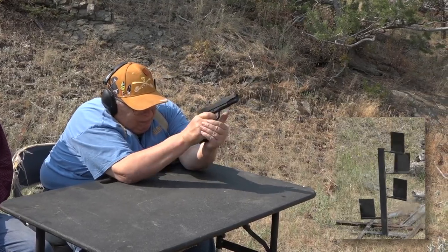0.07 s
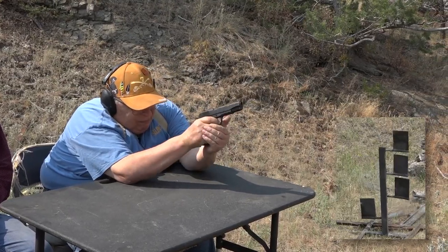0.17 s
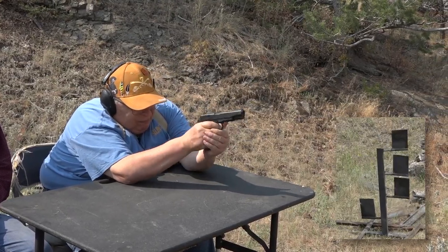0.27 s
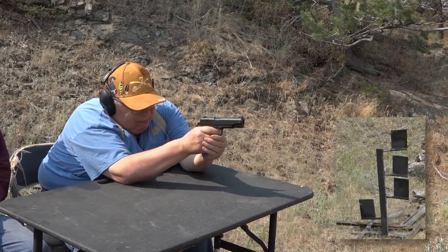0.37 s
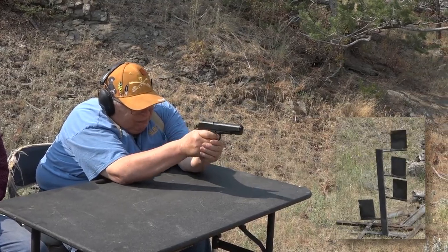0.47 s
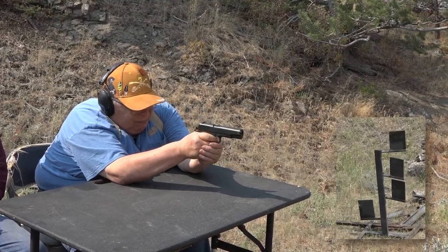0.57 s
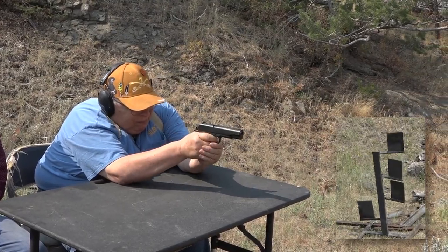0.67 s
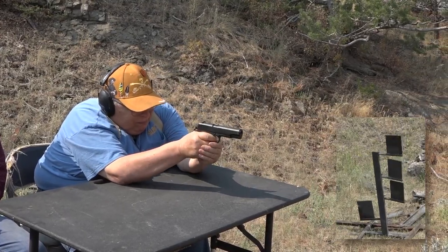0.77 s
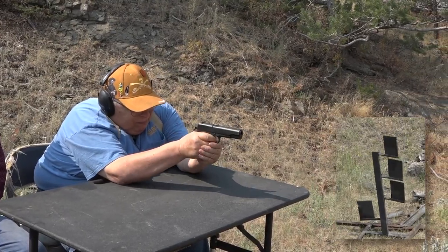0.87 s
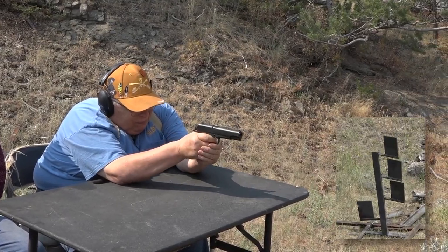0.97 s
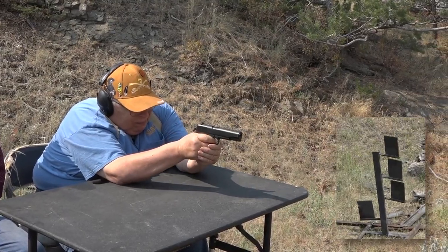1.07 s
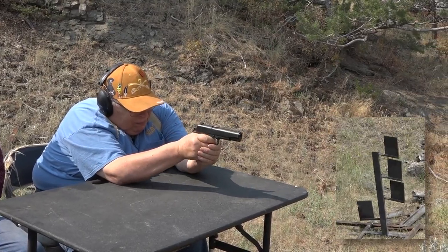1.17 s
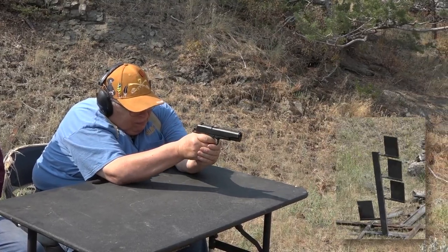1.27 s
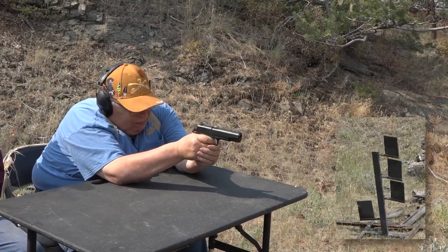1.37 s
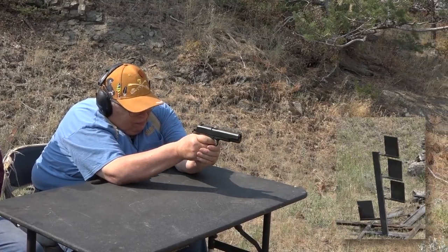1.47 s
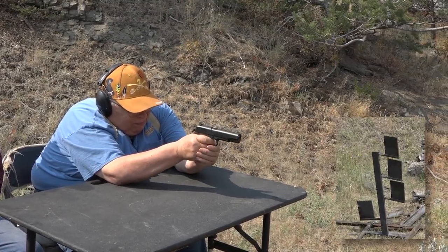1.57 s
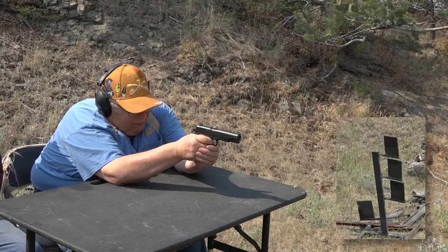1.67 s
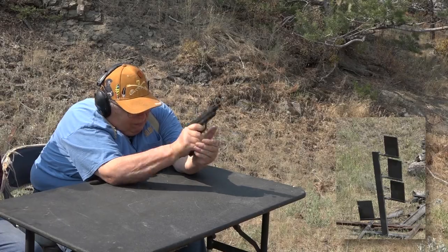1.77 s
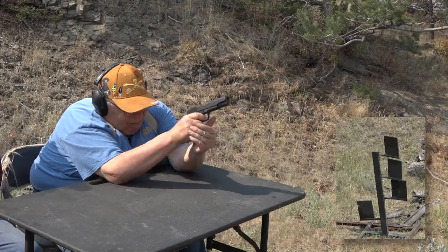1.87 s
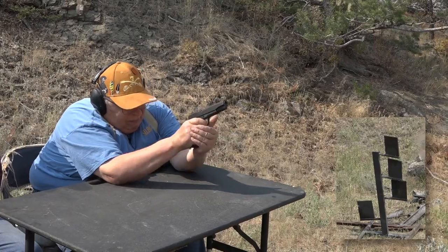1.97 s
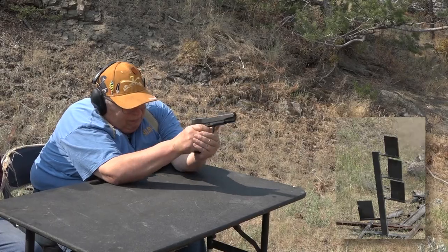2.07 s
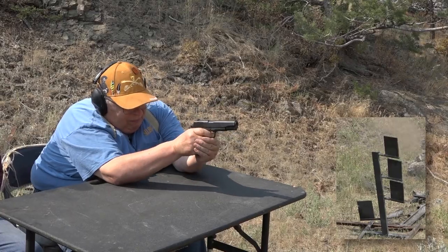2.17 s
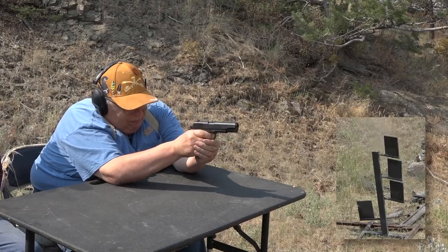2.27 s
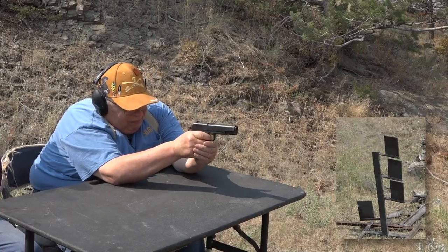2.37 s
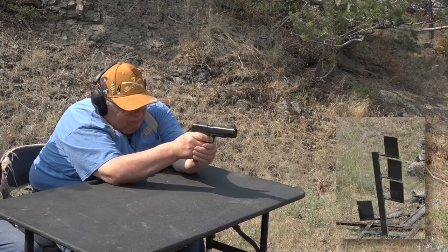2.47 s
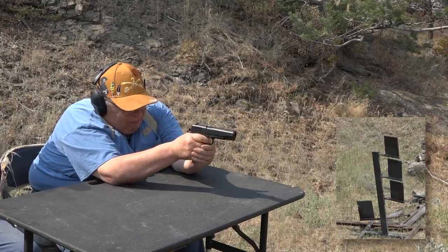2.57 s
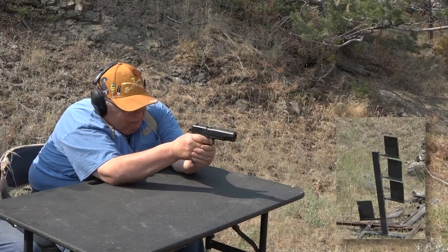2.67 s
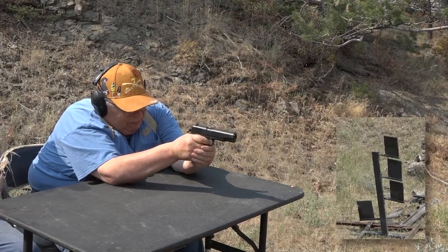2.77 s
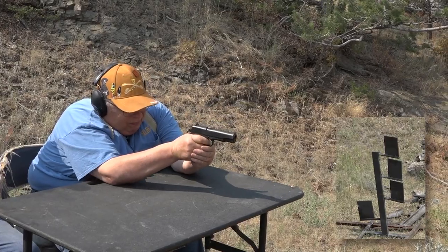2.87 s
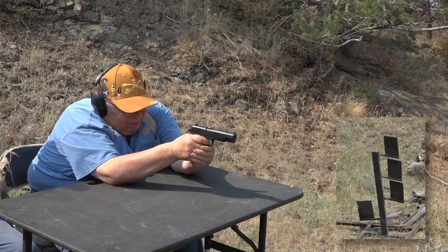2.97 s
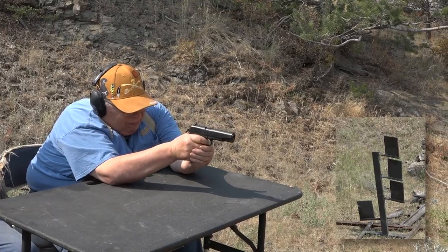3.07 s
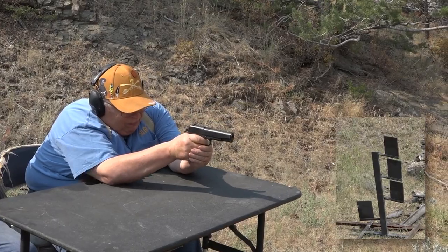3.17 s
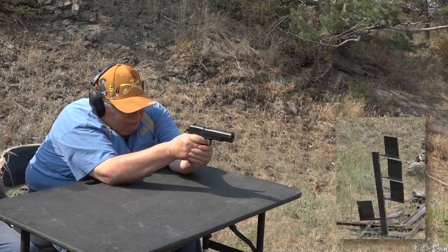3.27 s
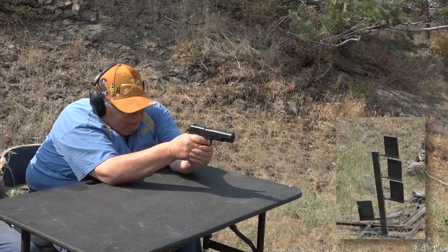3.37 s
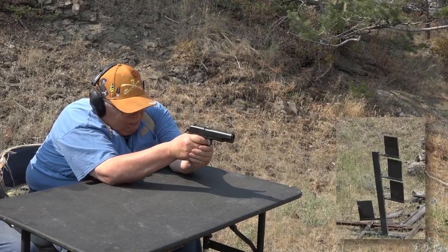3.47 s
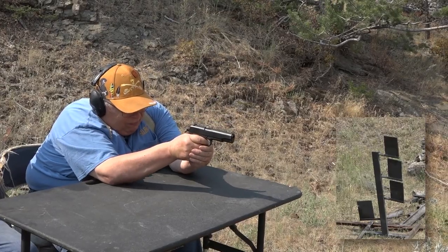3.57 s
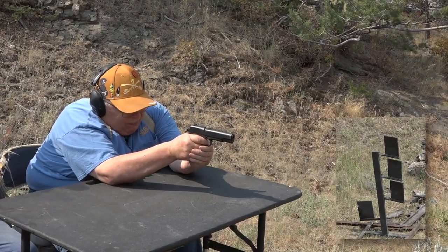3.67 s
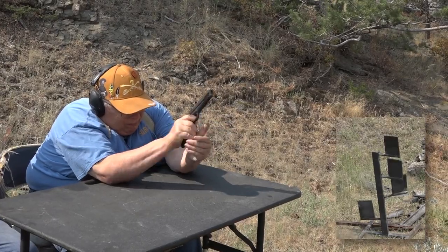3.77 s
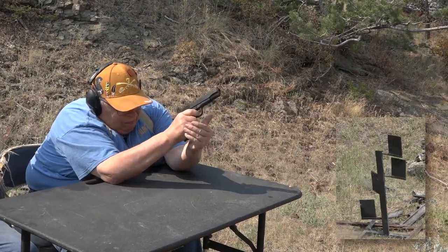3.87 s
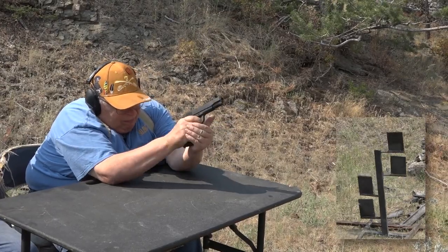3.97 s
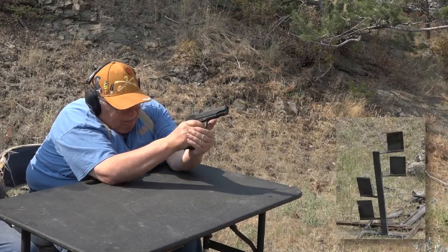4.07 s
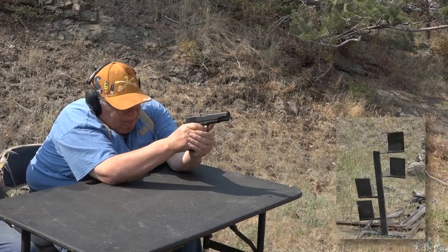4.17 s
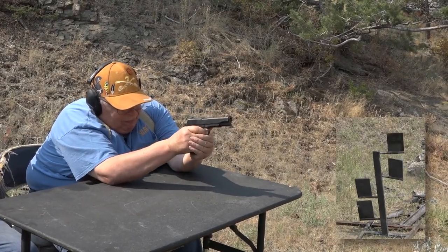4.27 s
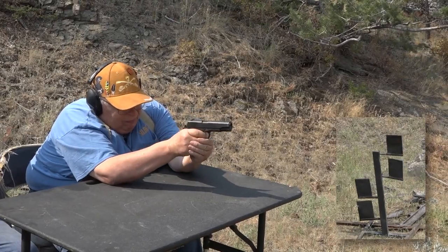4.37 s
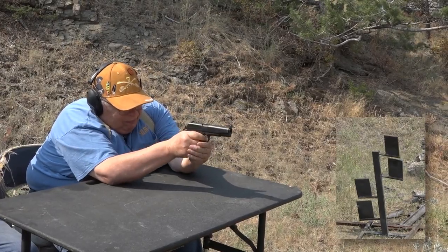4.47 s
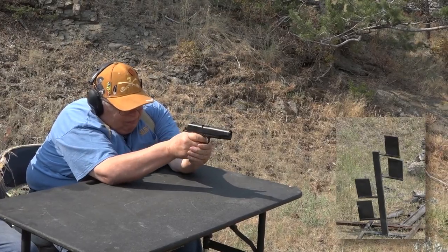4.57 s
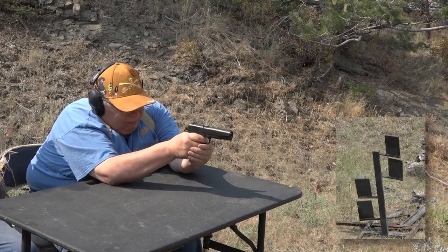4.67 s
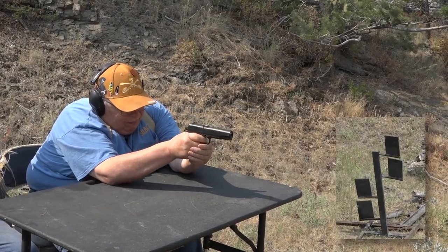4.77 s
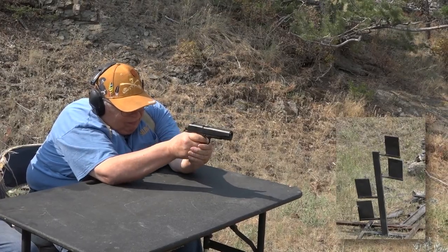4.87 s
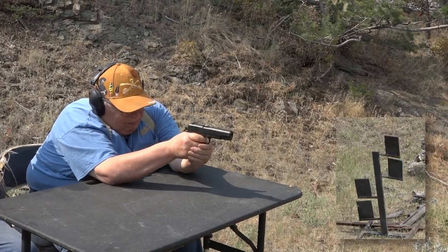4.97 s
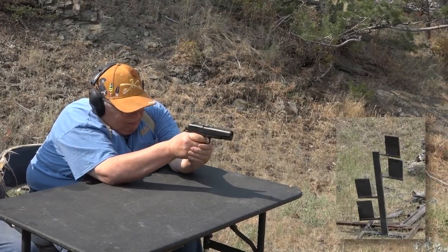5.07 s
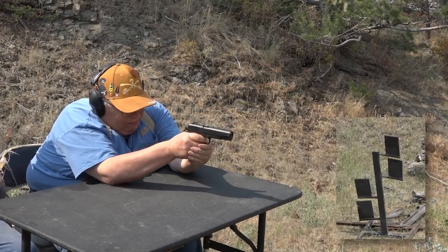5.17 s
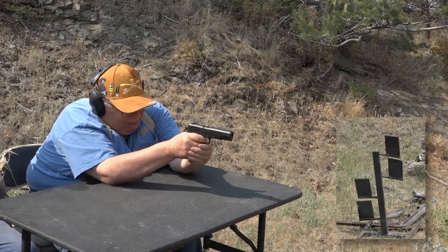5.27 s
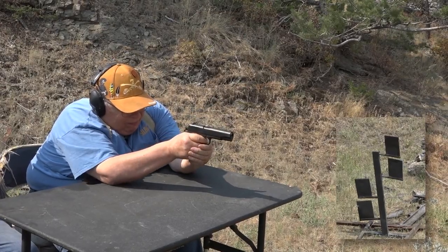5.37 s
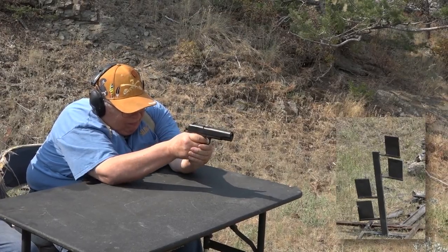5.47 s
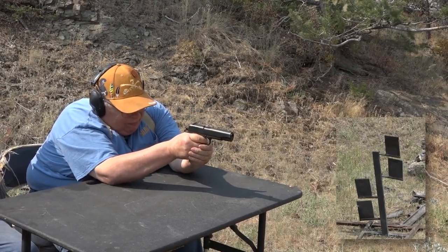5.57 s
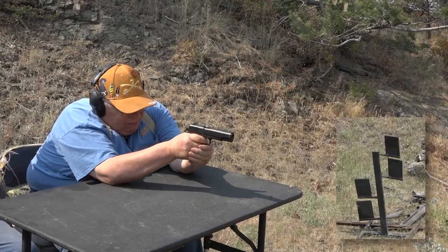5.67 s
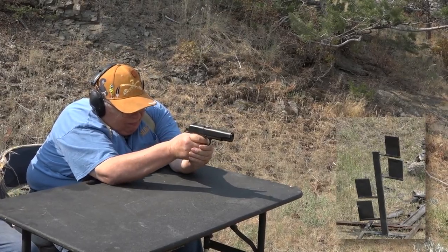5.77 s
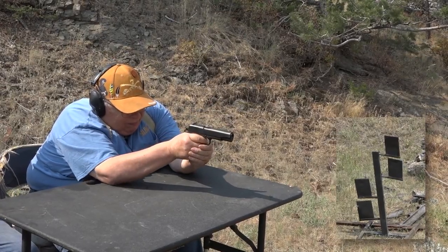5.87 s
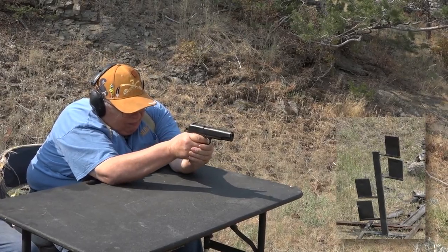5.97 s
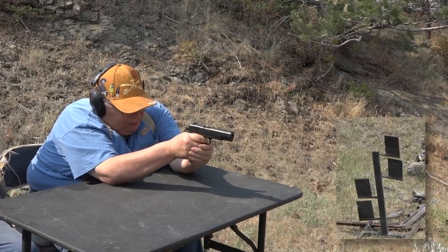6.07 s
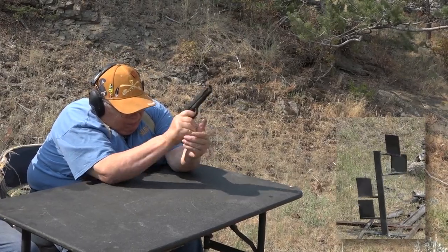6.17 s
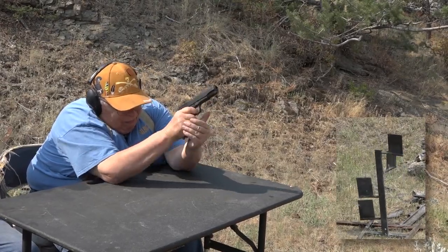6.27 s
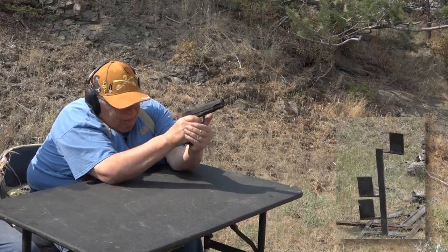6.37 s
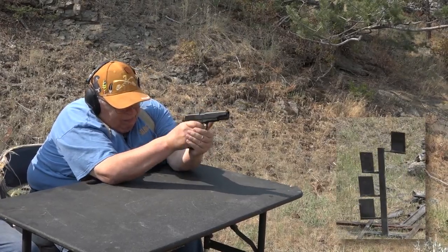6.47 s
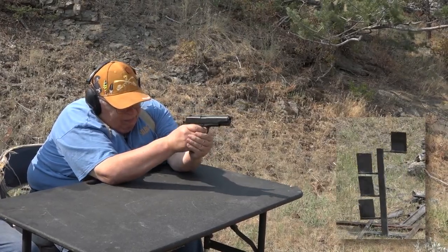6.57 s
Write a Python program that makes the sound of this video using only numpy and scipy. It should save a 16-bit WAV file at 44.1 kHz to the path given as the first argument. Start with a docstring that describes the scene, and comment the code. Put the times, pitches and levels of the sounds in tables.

```python
"""An outdoor range below a rocky slope: a pistol is fired slowly, the first shot just before the start.
Each blast overloads the microphones and scatters back from ground, slope and trees, with one late slap
from a far bank and soft puffs from distant ridges. A tenth of a second after each shot the bullet
strikes a steel paddle, which rings as it swings round. Spent brass sings as it tumbles.
Small metal ticks, pings and faint hoots sound over a light wind that buffets the microphones."""
import sys
import numpy as np
from scipy import signal
from scipy.fft import rfft, irfft, next_fast_len
from scipy.io import wavfile

SR = 44100
rng = np.random.default_rng(int(sys.argv[2]) if len(sys.argv) > 2 else 0)


def master(y):
    """Save y as 16-bit WAV."""
    cut = np.clip(np.atleast_2d(y).T, -1, 1)
    pcm = np.round(cut * 32767)  # scale
    wavfile.write(sys.argv[1], SR, pcm.astype(np.int16))


N = 292455
EVENT_SAMPLES = int(1.3 * SR)
AGE_S = np.arange(EVENT_SAMPLES) / SR
CUTOFF_HZ = 15900

# Pistol shots. Each row: start in seconds, then gains in dB of blast, far bank and ridges.
SHOTS = [(-0.1055, 1.5, -1.5, 7.5), (1.8119, 1, -1, -10), (3.7816, 1.5, 2.5, 6), (6.1667, 1.5, -4, 0)]
# Spectrum of far echoes. Each row: frequency in Hz, relative density in dB.
FAR_SPECTRUM = [(100, -20), (350, -2), (600, 9), (1500, 4.5), (2400, -8), (5000, -13), (9000, -29.5),
                (15000, -40)]
# Spectrum of metal ticks and bullet splash. Each row: frequency in Hz, relative density in dB.
METAL_SPECTRUM = [(1000, -25.5), (3000, -9), (7000, -7.5), (11000, 2), (15000, -5)]


def from_db(db):
    return 10 ** (np.asarray(db) / 20)


def unit_rms(x):
    return x / np.sqrt(np.mean(x ** 2) + 1e-20)


def pan(side_db):
    """Stereo gains; side is left minus right."""
    return from_db(np.array([[side_db], [-side_db]]) / 2)


def add(out, sound, start_s):
    """Mix a sound in; the start may be negative."""
    at = round(start_s * SR)
    first, last = max(at, 0), min(at + sound.shape[-1], out.shape[-1])
    if last > first:
        out[:, first:last] += sound[..., first - at:last - at]


def low_pass(x, hz):
    return signal.sosfilt(signal.butter(2, min(hz, .45 * SR), fs=SR, output="sos"), x)


def decay(t60_s):
    return np.exp(-np.minimum(np.log(1000) * AGE_S / t60_s, 40))


def swell(db, attack_s, rise_db, hold_s, sag_db, fall_db_per_s):
    """Gain that rises, sags while it holds, then falls."""
    rising_db = rise_db * np.maximum(1 - AGE_S / attack_s, 0)
    sagging_db = sag_db * np.clip((AGE_S - attack_s) / hold_s, 0, 1)
    falling_db = fall_db_per_s * np.maximum(AGE_S - attack_s - hold_s, 0)
    return from_db(db - rising_db - sagging_db - falling_db)


def wander(size, hz):
    """Slow random curve, rms 1."""
    return unit_rms(low_pass(rng.standard_normal(size + EVENT_SAMPLES), hz)[EVENT_SAMPLES:])


def noise(spectrum, size, coherence=0, peaks=()):
    """Stereo noise with a given spectrum, left-right coherence and resonances; rms 1."""
    padded = next_fast_len(size)
    hz = np.arange(padded // 2 + 1) * SR / padded + 1e-3
    knots_hz, knots_db = np.transpose(spectrum)
    db = np.interp(np.log(hz), np.log(knots_hz), knots_db)
    for centre_hz, width_hz, height_db in peaks:
        db += height_db / (1 + (2 * (hz - centre_hz) / width_hz) ** 2)
    white = rng.standard_normal((3, padded))
    stereo = np.sqrt(1 - coherence) * white[:2] + np.sqrt(coherence) * white[2]
    return unit_rms(irfft(rfft(stereo) * from_db(db), padded)[:, :size])


def bursts(rows, spectrum, size, rise_s):
    """Short, decaying, low-passed noise bursts."""
    out = np.zeros((2, size))
    length = EVENT_SAMPLES // 4
    for start_s, db, t60_s, top_hz, side_db in rows:
        burst = low_pass(noise(spectrum, length), top_hz)
        envelope = decay(t60_s) * (1 - np.exp(-AGE_S / rise_s))
        add(out, from_db(db) * pan(side_db) * burst * envelope[:length], start_s)
    return out


def partial(hz, waver, waver_hz):
    """Stereo sine; paths by way of the ground add a slowly changing share."""
    paths = low_pass(rng.standard_normal((2, 2, EVENT_SAMPLES)), waver_hz)
    paths = unit_rms(paths[0] + 1j * paths[1])
    phase = 2 * np.pi * (hz * AGE_S + rng.random() + rng.uniform(-1, 1, (2, 1)) / 6)
    return np.real((1 + waver * paths) * np.exp(1j * phase))


def trees(level_db=-57):
    """Even rush of air in the trees."""
    # Each row: frequency in Hz, relative density in dB.
    spectrum = [(15, -54.5), (25, -25), (53, -5), (263, -9), (293, -12), (326, -20), (363, -13.5),
                (451, -7.5), (677, -11.5), (840, -11), (1100, -3.5), (2160, -17.5), (12200, -45.5),
                (16000, -45.5)]
    return from_db(level_db) * noise(spectrum, N, coherence=0.056) * pan(-1.5)


def wind(trim_db=-0.36, eddy_db=3.0, eddy_hz=15):
    """Gusts buffet the microphones, each with its own eddies."""
    # Gust curve. Each row: time in seconds, gain in dB, side in dB.
    gusts = [(.35, -58, -8.5), (.72, -64, -14), (.88, -48.5, 22), (1.0, -58, 13), (1.32, -58.5, -9),
             (1.42, -59, 24.5), (1.65, -50, 6.5), (1.78, -61.5, 3.5), (2.38, -51.5, 0.5), (2.55, -66, 0.5),
             (2.97, -71.5, -11), (3.25, -64, -13), (3.47, -50.5, 5.5), (3.72, -51, 8.5),
             (4.25, -67.5, -4.5), (4.9, -65.5, -4.5), (5.52, -64, -4.5), (5.82, -44.5, 8),
             (5.97, -56.5, -2.5), (6.08, -45, 7), (6.62, -50.5, -5)]
    # Each row: frequency in Hz, relative density in dB.
    spectrum = [(25, -28.5), (63, -2.5), (120, 2), (250, -3.5), (400, -8), (600, -15), (1400, -34.5),
                (4000, -56), (16000, -79.5)]
    knots_s, *columns = np.transpose(gusts)
    gust_db, side_db = [np.interp(np.arange(N) / SR, knots_s, column) for column in columns]
    eddies = np.array([wander(N, eddy_hz), wander(N, eddy_hz)])
    level_db = trim_db + gust_db + np.array([side_db, -side_db]) / 2 + eddy_db * eddies
    return from_db(level_db) * noise(spectrum, N, coherence=0.39)


def wind_buffets():
    """Short, dull thumps of wind buffeting the left or right microphone."""
    # Each row: start in seconds, gain in dB, t60 in seconds, low-pass in Hz, side in dB.
    buffets = [(.841, -30, 0.047, 1430, 17), (1.095, -38, 0.081, 497, 23), (1.607, -36.5, 0.14, 540, 21.5),
               (3.115, -49, 0.14, 500, -31), (3.345, -41, 0.24, 700, -13.5), (4.982, -31.5, 0.12, 1090, 20),
               (5.2, -42, 0.13, 497, -13.5), (5.58, -44.5, .2, 450, 14.5)]
    # Each row: frequency in Hz, relative density in dB.
    spectrum = [(50, -7.5), (150, 1), (350, -3), (700, -8.5), (2000, -17), (8000, -19)]
    return bursts(buffets, spectrum, N, rise_s=0.0053)


def hoots():
    """Soft, pure gliding notes from far away."""
    # Each row: start and length in seconds, starting pitch in Hz, glide in Hz per second, level in dB.
    notes = [(2.88, 0.15, 886, -500, -57.5), (3.02, 0.072, 845, 306, -56), (3.246, 0.061, 854, -100, -56)]
    out = np.zeros((2, N))
    for start_s, length_s, hz, glide_hz_per_s, db in notes:
        arch = np.sin(np.pi * np.minimum(AGE_S / length_s, 1))
        tone = np.sin(2 * np.pi * (hz + glide_hz_per_s * AGE_S / 2) * AGE_S)
        add(out, from_db(db) * arch * tone, start_s)
    return out


def pings(side_db=5.0):
    """Small pieces of metal ring briefly."""
    # Each row: start in seconds, pitch in Hz, level in dB, t60 in seconds.
    rings = [(.922, 9200, -73.5, 0.083), (.985, 5200, -74, 0.066), (2.8475, 3430, -56, .02)]
    out = np.zeros((2, N))
    for start_s, hz, db, t60_s in rings:
        add(out, from_db(db) * np.sin(2 * np.pi * hz * AGE_S) * decay(t60_s) * pan(side_db), start_s)
    return out


def ticks():
    """Bright metal clicks that die within milliseconds."""
    # Each row: start in seconds, gain in dB, t60 in seconds, low-pass in Hz, side in dB.
    clicks = [(.1501, -30, 0.012, 16000, -5), (.9268, -59, 0.046, 7000, 8), (2.0223, -34, 0.022, 16000, -3),
              (2.8475, -31, 0.0055, 5000, 15.5), (3.9833, -29, 0.014, 16000, -3),
              (6.4961, -22, 0.004, 16500, -14)]
    return bursts(clicks, METAL_SPECTRUM, N, rise_s=0.00036)


def spent_cases(tumble_hz=4.95, tumble_db=0.5, side_db=10):
    """Ejected brass sings two thin tones, throbbing as it turns over."""
    # Each row: start and base hold in seconds, gains in dB of the lower and upper tone.
    flights = [(0.098, 0.072, -68.5, -68), (1.956, 0.62, -74.5, -47.5), (4.009, 0.25, -60.5, -68),
               (6.374, .08, -73, -63)]
    # Each row: pitch in Hz, share of the hold, sag in dB, release in dB per second.
    tones = [(10635, 0.62, -3.5, 126), (14470, 0.27, 19, 260)]
    out = np.zeros((2, N))
    tumble = from_db(tumble_db * np.cos(2 * np.pi * tumble_hz * AGE_S))
    for start_s, hold_s, *tone_dbs in flights:
        for (hz, share, sag_db, release_db_per_s), db in zip(tones, tone_dbs):
            envelope = swell(db, attack_s=0.026, rise_db=28, hold_s=share * hold_s,
                             sag_db=sag_db, fall_db_per_s=release_db_per_s)
            add(out, envelope * tumble * partial(hz, waver=0.9, waver_hz=7.6) * pan(side_db), start_s)
    return out


def plate_beam(quarter_turns, edge_db):
    """A plate is loud face-on and faint edge-on."""
    return np.hypot(np.cos(np.pi / 2 * quarter_turns), from_db(edge_db))


def paddles(clang_flat_hz=15, mistuning=0.0021, trim_db=-0.35, drag_per_s=0.97, stop_db_per_s=139):
    """The bullet splashes, the plate clangs flat, beating modes fade and swell as it swings to a stop."""
    # Each row: start in seconds; gains in dB of three main modes, overtones, clang and splash;
    # seconds per quarter turn before drag, edge-on gain in dB, damping in dB per second,
    # seconds until the stop, share of the twin modes.
    strikes = [(-0.006, -17, -16, -27, -8.5, -10, -28, 0.11, -14, 61.5, 0.22, .12),
               (1.916, -24.5, -27.5, -35, -13, -29.5, -30, 0.2, -6.5, 82, 0.47, 0.027),
               (3.882, -35, -35, -24.5, -6.5, -3, -20.5, 0.15, -3, 60, 0.37, 0.68),
               (6.266, -13.5, -12, -18, -1.5, -13, -22.5, 0.14, -17, 63, 0.32, 0.17)]
    # Each row: pitch in Hz, clang gain in dB, side in dB, build-up in seconds,
    # own decay in dB per second, beam narrowness, step up to its twin in Hz.
    main_modes = [(1739, -20, -11, .002, 0.5, 0.94, 6.5), (3593, -26.5, -3, 0.035, 16, .92, 5.5),
                  (4677, -9, 10, .002, 49.5, .88, 17)]
    # Each row: pitch in Hz, gain in dB, t60 in seconds, side in dB.
    overtones = [(1590, -32.5, .2, -4), (1980, -36, .3, -7.5), (3090, -42, .25, 2), (6340, -30.5, 0.14, 9),
                 (6900, -33.5, 0.065, 6), (8200, -38, 0.054, -1), (8700, -39, 0.069, 1.5),
                 (9320, -35.5, 0.33, -1), (10560, -34.5, 0.06, 1.5), (10620, -32, .2, 8.5),
                 (10800, -51.5, .7, 2.5), (11170, -36, 0.14, 2.5), (11220, -40.5, 0.11, 2),
                 (14290, -36.5, 0.23, 8), (14520, -38.5, .3, 5.5), (15150, -35.5, .12, 8.5)]
    out = np.zeros((2, N))
    for (start_s, *mode_dbs, overtones_db, hit_db, splash_db,
         quarter_s, edge_db, damping_db_per_s, stop_s, twin_share) in strikes:
        loss_db = damping_db_per_s * AGE_S + stop_db_per_s * np.maximum(AGE_S - stop_s, 0)
        quarter_turns = AGE_S / quarter_s * np.exp(-drag_per_s * AGE_S)
        sound = from_db(splash_db) * noise(METAL_SPECTRUM, EVENT_SAMPLES) * decay(t60_s=0.19)
        for mode, db in zip(main_modes, mode_dbs):
            hz, clang_db, side_db, build_s, own_db_per_s, narrowness, split_hz = mode
            pair = partial(hz, waver=0.12, waver_hz=24.7)
            pair += twin_share * partial(hz + split_hz, waver=0.067, waver_hz=24.91)
            build_up = 1 - np.exp(-AGE_S / build_s)
            envelope = build_up * from_db(trim_db + db - loss_db - own_db_per_s * AGE_S)
            ring = pair * envelope * plate_beam(narrowness * quarter_turns, edge_db)
            clang = partial(hz - clang_flat_hz, waver=0.23, waver_hz=45) * decay(t60_s=0.16)
            sound += (ring + from_db(clang_db + hit_db) * clang) * pan(side_db)
        for hz, db, t60_s, side_db in overtones:
            own_hz = hz * (1 + mistuning * rng.standard_normal())   # no two paddles are alike
            overtone = partial(own_hz, waver=0.98, waver_hz=34.6) * decay(t60_s)
            sound += from_db(db + overtones_db) * overtone * pan(side_db)
        add(out, sound * (1 - np.exp(-AGE_S / 0.0011)), start_s)
    return out


def ridge_echoes(first_s=.62, gap_s=.06, jitter_s=0.0081, count=7, t60_s=0.032, top_hz=1700,
                 base_db=-39, fall_db_per_s=10, spread_db=4):
    """Soft dull puffs return from distant ridges at uneven gaps."""
    rows = []
    for start_s, _, _, ridge_db in SHOTS:
        late, loud = rng.standard_normal((2, count))
        delays_s = gap_s * np.arange(count) + jitter_s * late
        gains_db = base_db + ridge_db - fall_db_per_s * delays_s + spread_db * loud
        for delay_s, db in zip(delays_s, gains_db):
            rows.append((start_s + first_s + delay_s, db, t60_s, top_hz, 0))
    return bursts(rows, FAR_SPECTRUM, N, rise_s=0.0078)


def scatter(spectrum, coherence, repeat_share, clumps_db, thinning_db_per_s=0, peaks=()):
    """One clumpy cloud of reflections per shot; the terrain stays put, so a share repeats."""
    depth_db = clumps_db + thinning_db_per_s * AGE_S
    clumps = [from_db(depth_db * (np.minimum(wander(EVENT_SAMPLES, hz=60), 1.7) - .5))
              for _ in range(len(SHOTS) + 1)]
    clouds = np.array([unit_rms(noise(spectrum, EVENT_SAMPLES, coherence, peaks) * clump)
                       for clump in clumps])
    return np.sqrt(repeat_share) * clouds[0] + np.sqrt(1 - repeat_share) * clouds[1:]


def air_absorption(x, loss_db_per_s_khz=8.7, neutral_s=.27):
    """Longer paths lose more treble: early returns are brighter, late ones duller."""
    out, below = 0, 0
    for top_hz in 1000 * 2 ** np.arange(5):
        low = x
        if top_hz < CUTOFF_HZ / 2:
            low = signal.sosfiltfilt(signal.butter(2, top_hz, fs=SR, output="sos"), x)
        loss_db = loss_db_per_s_khz * (top_hz / 2000 - .5) * (AGE_S - neutral_s)
        out = out + (low - below) * from_db(-loss_db)
        below = low
    return out


def slope_scatter():
    """Per shot: the slope's answer swells late and the woods behind it linger."""
    # Each row: frequency in Hz, relative density in dB.
    spectrum = [(60, -45.5), (250, -25), (400, -5.5), (560, 0.5), (1050, -1.5), (1600, -13), (2500, -15),
                (4300, -19), (8000, -36), (16000, -48.5)]
    slope = swell(db=-33, attack_s=0.16, rise_db=21, hold_s=0.12, sag_db=-3, fall_db_per_s=168)
    woods = swell(db=-47.5, attack_s=.39, rise_db=30.5, hold_s=0.16, sag_db=3, fall_db_per_s=170)
    linger = from_db(-62) * decay(t60_s=12)
    envelope = np.sqrt(slope ** 2 + woods ** 2 + linger ** 2)
    clouds = scatter(spectrum, coherence=0.11, repeat_share=0.84, clumps_db=0.37, thinning_db_per_s=8)
    return air_absorption(clouds * envelope) * pan(-5.5)


def ground_scatter():
    """Per shot: the early answer of the nearby ground."""
    # Each row: frequency in Hz, relative density in dB.
    spectrum = [(40, -32.5), (120, -27), (230, -16.5), (400, -10.5), (600, -5.5), (850, 1), (1350, -1.5),
                (2000, -9.5), (4100, -15.5), (11000, -27.5), (16000, -28.5)]
    envelope = swell(db=-21, attack_s=0.058, rise_db=15.5, hold_s=0.062, sag_db=4, fall_db_per_s=238.5)
    return scatter(spectrum, coherence=0.13, repeat_share=0.34, clumps_db=2.5) * envelope * pan(-2.5)


def muzzle_blasts(push_hz=100, push_db=-15.5):
    """Per shot: the low shove of expanding gas under an abrupt burst of noise."""
    # Each row: frequency in Hz, relative density in dB.
    spectrum = [(24, -51.5), (40, -29), (354, -5.5), (663, -5), (790, -3.5), (1680, -8), (2100, -7.5),
                (3740, -17), (12100, -28), (16000, -30.5)]
    # Resonances of bench and surroundings. Each row: centre and width in Hz, height in dB.
    bench = [(222, 45, 9), (378, 55, 8), (497, 40, 5), (810, 55, 6), (955, 50, 4), (1174, 60, 3)]
    push = from_db(push_db) * np.sin(2 * np.pi * push_hz * AGE_S) * decay(t60_s=0.027)
    envelope = swell(db=-8, attack_s=0.0012, rise_db=11.5, hold_s=.022, sag_db=4, fall_db_per_s=951)
    clouds = scatter(spectrum, coherence=0.25, repeat_share=0.32, clumps_db=1.5, peaks=bench)
    return push + clouds * envelope


def gunshots(left_lag_s=.0017, overload=.72, bass_cut_hz=62):
    """Each blast overloads the microphones, reaching the right one first; then the terrain answers."""
    # Distinct reflections, near and from the far bank.
    # Each row: delay in seconds, gain in dB, t60 in seconds, low-pass in Hz, side in dB.
    near_echoes = [(.044, -22.5, 0.083, 14100, 7), (.063, -10, 0.03, 11770, -1.5),
                   (.0795, -3.5, 0.038, 1600, 0.5), (.234, -18, 0.074, 1610, -3),
                   (.266, -19.5, 0.12, 1190, -2.5), (.394, -30.5, 0.091, 1700, 1)]
    bank_echoes = [(.533, -15.5, .03, 5000, -5), (.549, -33, .06, 3000, -3)]
    # Each row: frequency in Hz, relative density in dB.
    echo_spectrum = [(100, -40), (300, -16.5), (550, 3), (1400, -2), (2500, -8.5), (5000, -9), (15000, -6)]
    blasts, ground, slope = muzzle_blasts(), ground_scatter(), slope_scatter()
    bass_cut = signal.butter(2, bass_cut_hz, "high", fs=SR, output="sos")
    out = np.zeros((2, N))
    for k, (start_s, db, bank_db, _) in enumerate(SHOTS):
        clipped = overload * np.tanh(from_db(db) * blasts[k] / overload)
        left, right = signal.sosfilt(bass_cut, clipped)
        add(out[:1], left, start_s + left_lag_s)
        add(out[1:], right, start_s)
        echoes = bursts(near_echoes, echo_spectrum, EVENT_SAMPLES, rise_s=0.00092)
        slap = bursts(bank_echoes, FAR_SPECTRUM, EVENT_SAMPLES, rise_s=0.0064)
        add(out, from_db(db) * (ground[k] + slope[k] + echoes) + from_db(bank_db) * slap, start_s)
    return out


def scene():
    """Shots, steel, brass and small sounds in the open air."""
    return (wind_buffets() + gunshots() + ridge_echoes() + paddles() + spent_cases()
            + ticks() + pings() + hoots() + wind() + trees())


def record(dry):
    """Round the highest peaks, cut the top."""
    rounded = dry / (1 + (dry / .85) ** 6) ** (1 / 6)
    return signal.sosfilt(signal.ellip(10, .1, 80, CUTOFF_HZ, fs=SR, output="sos"), rounded)


dry = scene()
out = record(dry)
master(out)
```